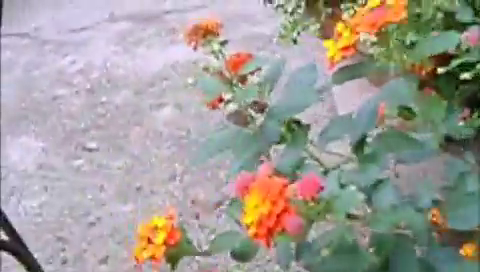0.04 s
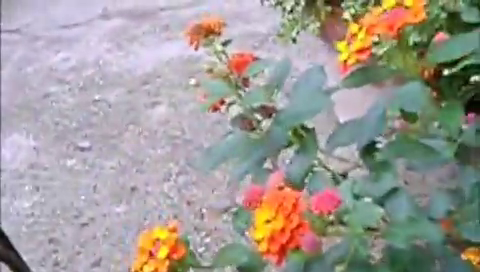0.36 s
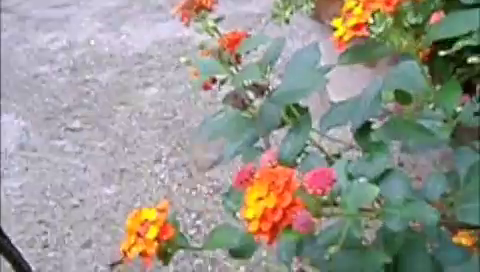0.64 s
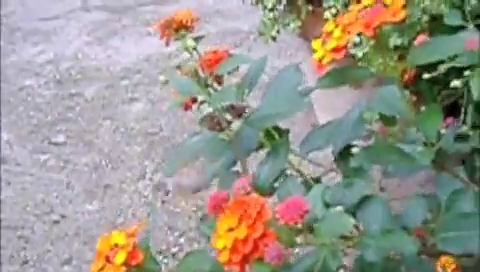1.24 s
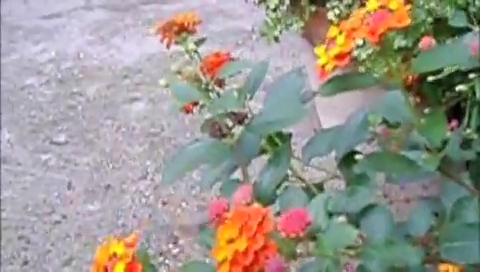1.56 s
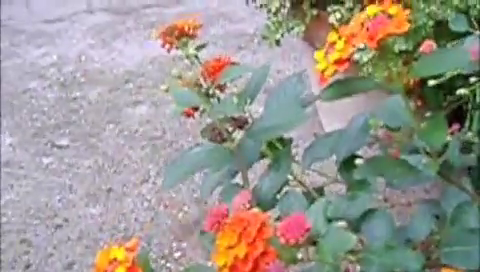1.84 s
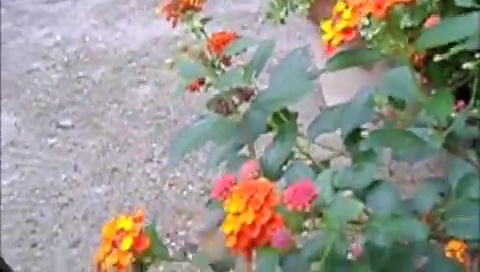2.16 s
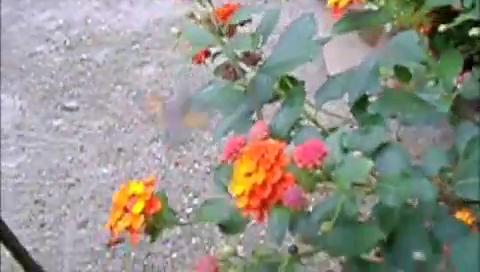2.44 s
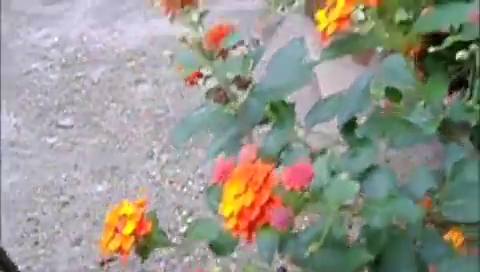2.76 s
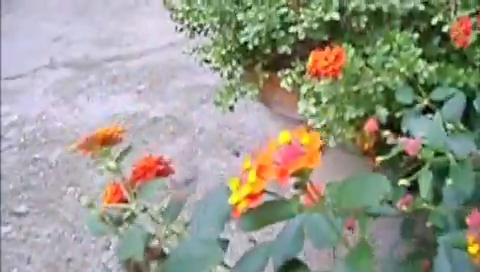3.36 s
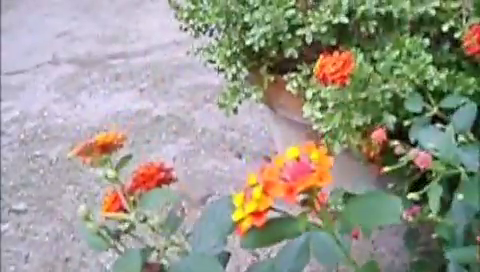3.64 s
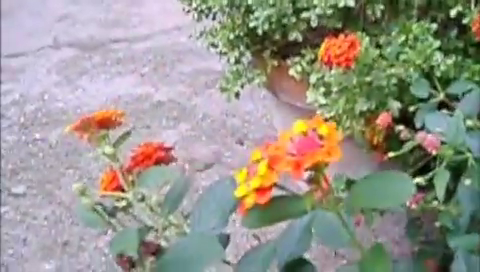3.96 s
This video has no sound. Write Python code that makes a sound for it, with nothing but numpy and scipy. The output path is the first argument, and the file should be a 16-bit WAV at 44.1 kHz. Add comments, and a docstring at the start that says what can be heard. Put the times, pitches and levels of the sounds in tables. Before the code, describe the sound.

Soft low rumble and a far engine-like drone swell and fade in a garden, heard through a handheld camera with hiss and a thin whine. Light handling bumps and clicks come first, then one short rising bird whistle.

```python
"""A quiet garden

A low drone, probably a distant engine, swells and fades over a soft rumble. A hand bumps and clicks
on the case of a small camera, which adds its own hiss and a thin whine. Something, probably leaves,
rustles faintly twice. Near the end a bird gives one rising whistle and a faint afternote, and both
echo off walls and plants."""
import sys
import numpy as np
from scipy import signal
from scipy.fft import rfft, irfft
from scipy.io import wavfile
from scipy.ndimage import uniform_filter1d

SR = 44100
rng = np.random.default_rng(int(sys.argv[2]) if len(sys.argv) > 2 else 0)


def to_wav(sig):
    """Store sig (one row per channel, or 1-D mono) as 16-bit WAV at the path in sys.argv[1].

    Samples outside -1..1 are clipped; the rate is SR.
    """
    pcm = np.clip(np.atleast_2d(sig), -1, 1) * 32767
    pcm = np.round(pcm).astype(np.int16)
    wavfile.write(sys.argv[1], SR, pcm.T)  # frames by channels


N = 176400
T = np.arange(N) / SR

# the tone colour of the camera's hiss: (frequency [Hz], relative level [dB])
HISS_SPECTRUM = [(300, -2), (1000, -6.5), (2000, 1.5), (3500, 0.5), (5500, 0), (6500, -1.5), (7200, -5.5),
                 (8000, -13), (8500, -27), (9000, -32.5)]
# steady thin tones near 8 kHz: (pitch [Hz], level [dB])
THIN_TONES = [(7888, -74.5), (8112, -77.5), (8644, -86.5), (8710, -87.5)]
# the tone colour of the outdoor rumble: (frequency [Hz], relative level [dB])
RUMBLE_SPECTRUM = [(20, -8), (38, -5), (55, 1.5), (78, 5.5), (98, -9.5), (135, -3), (180, -11), (220, -8.5),
                   (270, -14), (450, -18.5), (800, -23.5), (1500, -30), (4000, -54.5)]
# how loud the rumble is: (time [s], level [dB])
RUMBLE_LOUDNESS = [(0, -41.5), (.75, -43), (1.4, -42.5), (2.12, -42.5), (2.6, -43), (3, -44.5), (4, -43)]
# faint rustles: (time [s], half-length [s], level [dB])
RUSTLES = [(2.427, 0.029, -61), (3.752, .012, -55)]
# tiny knocks on the case: (time [s], strength [dB])
KNOCKS = [(1.4743, -36), (1.477, -40), (1.482, -46), (2.948, -45)]
# the notes a knock sets ringing: (pitch [Hz], relative level [dB], time to fade by 60 dB [s])
CLICK_NOTES = [(620, -8, .022), (1150, -9, .011), (2100, -10, .006), (3500, -6, .006), (4600, -3, .006),
               (5600, -5, .005), (6900, -6, .005)]
# the hand shifts on the case: (time [s], half-length [s], thud level [dB], rub level [dB])
HAND_BUMPS = [(.172, .016, -45, -64), (.633, .005, -39.5, -49), (1.24, .013, -44, -58),
              (1.878, .018, -40, -56), (2.405, .024, -40.5, -58)]
# the low notes of a thud: (pitch [Hz], width of its wander [Hz], relative level [dB])
THUD_NOTES = [(157.1, 12, 4), (232, 48, -12.5), (310, 43, -7), (429, 80, -10), (595, 140, -11)]
# the tone colour of skin rubbing on the case: (frequency [Hz], relative level [dB])
RUB_SPECTRUM = [(300, 0), (700, 0.5), (1100, -5), (1700, 3), (2300, -5), (2900, -7.5), (4300, -10.5),
                (8000, -28.5)]
# the bird's rising whistle: (time [s], pitch [Hz], level [dB])
BIRD_WHISTLE = [(3.362, 2950, -72), (3.388, 3280, -58), (3.408, 3370, -55), (3.42, 3560, -53.5),
                (3.448, 3740, -53.5), (3.463, 3860, -47), (3.485, 4000, -52.5), (3.513, 4025, -46),
                (3.54, 4090, -54.5), (3.598, 4080, -54), (3.615, 4070, -68)]
# the faint note after it: (time [s], pitch [Hz], level [dB])
BIRD_AFTERNOTE = [(3.668, 3404, -73), (3.68, 3510, -55), (3.705, 3760, -67), (3.745, 3491, -68)]
# how loud the hum above the drone is: (time [s], level [dB])
HUM_LOUDNESS = [(0, -53), (.4, -46.5), (.9, -51), (1.1, -47.5), (1.7, -47.5), (2.15, -45), (2.6, -48.5),
                (3, -53.5), (4, -49.5)]
# the drone's low note: (time [s], pitch [Hz])
DRONE_NOTE = [(0, 58.2), (.3, 55.83), (.8, 58), (1.05, 57.94), (1.25, 59.04), (1.55, 58.4), (1.8, 59.42),
              (2.05, 58.55), (2.5, 57.5), (2.8, 60), (3.3, 61.5), (3.7, 63), (4, 61.83)]
# how that note swells and fades: (time [s], relative level [dB])
DRONE_SWELLS = [(0, -30.5), (.14, -29.5), (.33, -32.5), (.47, -42), (.72, -46), (.86, -37), (1.05, -34),
                (1.28, -32.5), (1.5, -37), (1.9, -32.5), (2.1, -36), (2.27, -50), (2.38, -34.5),
                (2.61, -35.5), (3.06, -51), (3.15, -40.5), (3.35, -41), (3.57, -52), (3.68, -41.5),
                (4, -47)]


def from_db(db):
    """Turn decibels into a number to multiply by."""
    return 10 ** (np.asarray(db) / 20)


def rms_one(x):
    """Scale a sound so that its average size (rms) is 1."""
    return x / np.sqrt(np.mean(x ** 2) + 1e-20)


def in_time(rows):
    """Join a table's points with straight lines, one curve for each column after the time."""
    times, *columns = np.transpose(rows)
    return [np.interp(T, times, column) for column in columns]


def drift(rate_hz):
    """A smooth random wobble of size about 1; a higher rate wobbles faster."""
    step, warm_up = 40, 2000  # one random value every 40 samples; the first 2000 are skipped
    r = np.exp(-2 * np.pi * rate_hz * step / SR)
    noise = rng.standard_normal(N // step + warm_up + 2)
    slow = signal.lfilter([1], [1, -2 * r, r * r], noise)[warm_up:]
    return np.interp(np.arange(N) / step, np.arange(len(slow)), rms_one(slow))


def tone(hz):
    """A pure tone of rms 1 that follows a pitch."""
    cycles = np.cumsum(hz * np.ones(N)) / SR
    return np.sqrt(2) * np.sin(2 * np.pi * (cycles + rng.random()))


def coloured(spectrum):
    """Noise of rms 1 with the given tone colour, falling away below its first frequency."""
    hz, db = np.transpose(spectrum)
    f = np.maximum(np.fft.rfftfreq(N, 1 / SR), 1)
    gain = from_db(np.interp(np.log(f), np.log(hz), db)) * np.minimum(f / hz[0], 1) ** 2
    return rms_one(irfft(rfft(rng.standard_normal(N)) * gain, N))


def ring(x, hz, fade_s):
    """Each push in x starts a note that dies away by 60 dB in fade_s."""
    r, w = from_db(-60 / (fade_s * SR)), 2 * np.pi * hz / SR
    return signal.lfilter([0, np.sin(w)], [1, -2 * r * np.cos(w), r * r], x + 1e-18)


def swell(time, half_length):
    """A smooth rise and fall around a moment."""
    return np.exp(-.5 * ((T - time) / half_length) ** 2)


def camera_noise(hiss_db=-56, whine_db=-64, whine_hz=7322.6, restarts_per_s=66.27):
    """Even hiss, thin tones and a high whine whose regular restarts give it a slight buzz."""
    since_restart = T % (1 / restarts_per_s)
    whine = from_db(whine_db) * rms_one(np.sin(2 * np.pi * whine_hz * since_restart))
    hiss = from_db(hiss_db) * coloured(HISS_SPECTRUM)
    return hiss + whine + sum(from_db(db) * tone(hz) for hz, db in THIN_TONES)


def rumble(flutter_db=1.0):
    """The dull, slightly restless background of the outdoors."""
    level = in_time(RUMBLE_LOUDNESS)[0] + flutter_db * drift(24)
    return from_db(level) * coloured(RUMBLE_SPECTRUM)


def rustles(centre_hz=4850, width_hz=900):
    """Short, soft puffs of bright noise, probably brushing leaves."""
    fade_s = np.log(1000) / (np.pi * width_hz)  # a shorter ring lets a wider band of noise through
    noise = rms_one(ring(rng.standard_normal(N), centre_hz, fade_s))
    return noise * sum(from_db(db) * swell(time, half_length) for time, half_length, db in RUSTLES)


def case_clicks():
    """Tiny knocks make the plastic case ring for a few milliseconds."""
    times, strengths = np.transpose(KNOCKS)
    knocks = np.zeros(N)
    knocks[(times * SR).astype(int)] = from_db(strengths)
    return sum((-1) ** k * from_db(db) * ring(knocks, hz, fade_s)  # every other note starts downward
               for k, (hz, db, fade_s) in enumerate(CLICK_NOTES))


def hand_bumps(lag_s=.005, grain_db=1.5):
    """Each shift of the hand is a short grainy rub; the case thuds with it, a little later and longer."""
    thud = rms_one(sum(from_db(db) * tone(hz + width / 2 * drift(width)) for hz, width, db in THUD_NOTES))
    rub = rms_one(coloured(RUB_SPECTRUM) * from_db(grain_db * drift(120)))
    sound = np.zeros(N)
    for time, half_length, thud_db, rub_db in HAND_BUMPS:
        sound += from_db(thud_db) * thud * swell(time + lag_s, half_length + lag_s)
        sound += from_db(rub_db) * rub * swell(time, half_length)
    return sound


def with_echoes(x, count=90, echo_db=-2, fade_s=.45):
    """A sound plus its echoes from walls and plants, weaker the later they come."""
    delays = rng.uniform(.012, .18, count)  # seconds
    gains = from_db(-60 * delays / fade_s)
    echoes = sum(gain * np.pad(x, (int(delay * SR), 0))[:N] for delay, gain in zip(delays, gains))
    return x + from_db(echo_db) * echoes / np.linalg.norm(gains)


def bird(note, waver_db=1.5, pitch_wobble=.005):
    """A nearly pure whistle with a slight tremble."""
    pitch, db = in_time(note)
    singing = (T > note[0][0]) & (T < note[-1][0])
    soft_edges = uniform_filter1d(singing.astype(float), size=200)
    loudness = soft_edges * from_db(db + waver_db * drift(50))
    return loudness * tone(pitch * (1 + pitch_wobble * drift(90)))


def drone(low_db=-.2, octave_db=-58, low_waver_db=.4, upper_waver_db=3.5):
    """Probably a distant engine: a low note, a faint one an octave up and a less steady hum above."""
    pitch = in_time(DRONE_NOTE)[0] * (1 + .007 * drift(7.4))
    low = from_db(in_time(DRONE_SWELLS)[0] + low_db + low_waver_db * drift(4.2)) * tone(pitch)
    octave = from_db(octave_db + upper_waver_db * drift(1.1)) * tone(2 * pitch)
    hum_db = in_time(HUM_LOUDNESS)[0] + upper_waver_db * drift(6.2)
    hum_hz = 145.6 * (1 + .03 * drift(6.7))
    return low + octave + from_db(hum_db) * tone(hum_hz)


def scene():
    """All the sounds add up at one microphone."""
    sound = drone() + rumble() + hand_bumps() + case_clicks() + rustles()
    birdsong = with_echoes(bird(BIRD_WHISTLE) + bird(BIRD_AFTERNOTE))
    return (sound + birdsong + camera_noise())[None]


def record(dry, cutoff_hz=8807):
    """The highest treble is cut off steeply."""
    return signal.sosfilt(signal.ellip(12, .1, 90, cutoff_hz, fs=SR, output="sos"), dry)


dry = scene()
out = record(dry)
to_wav(out)
```